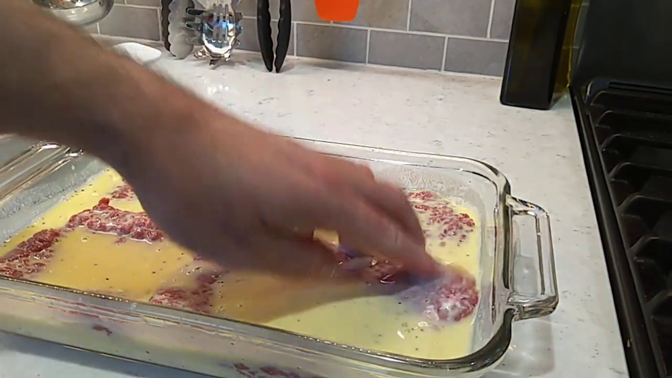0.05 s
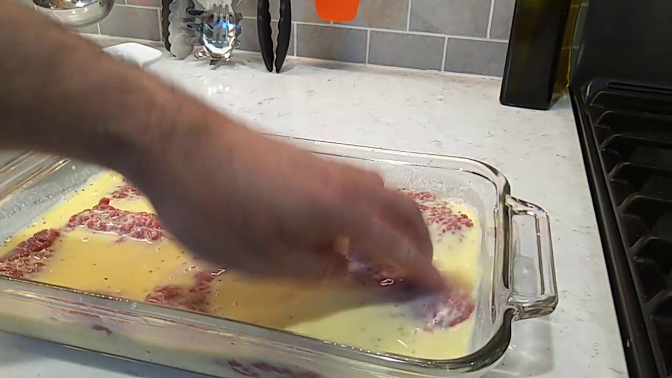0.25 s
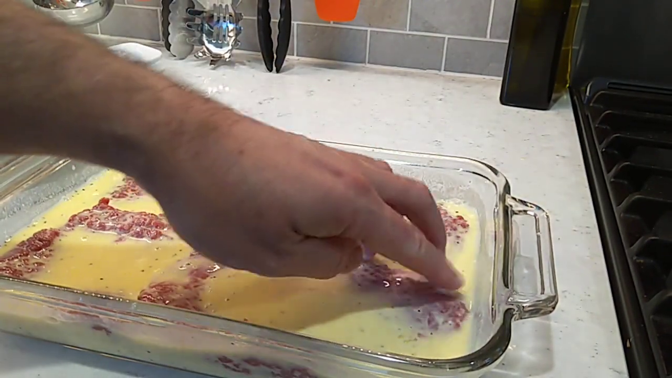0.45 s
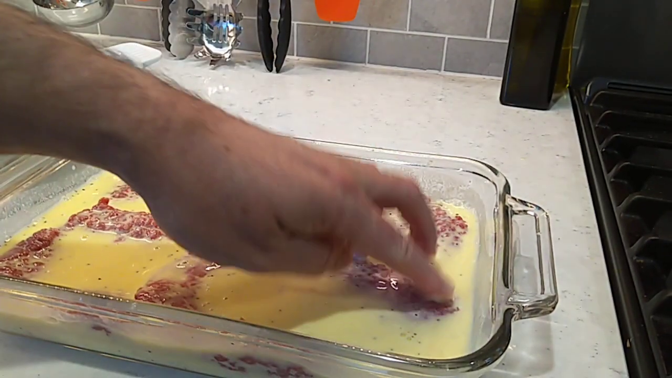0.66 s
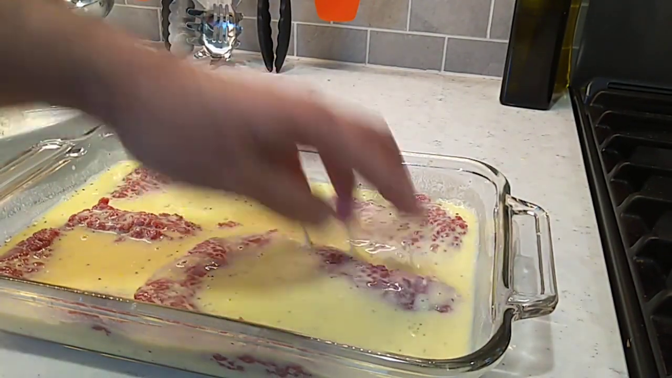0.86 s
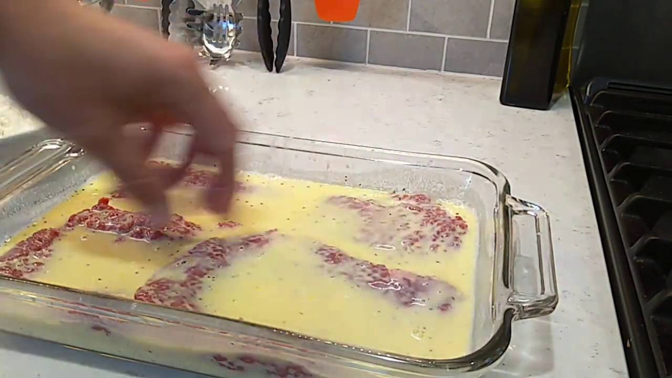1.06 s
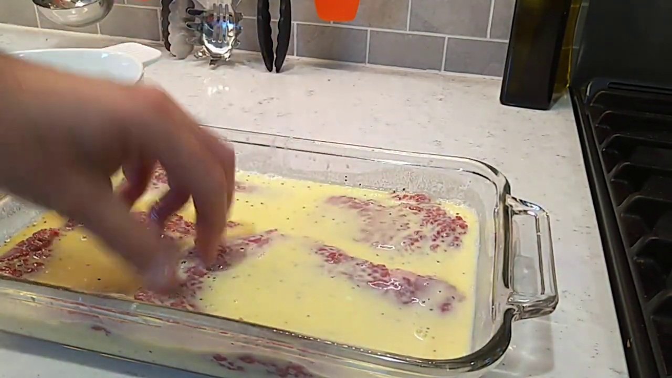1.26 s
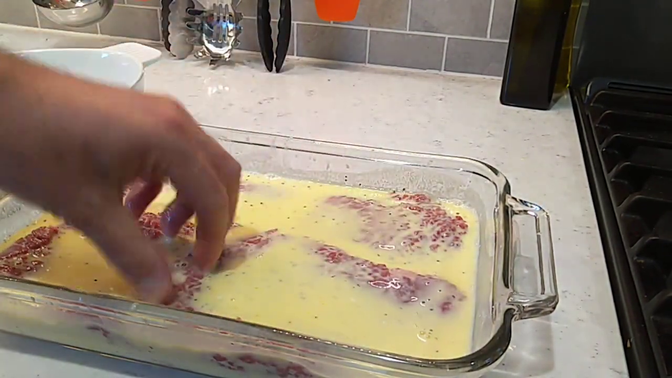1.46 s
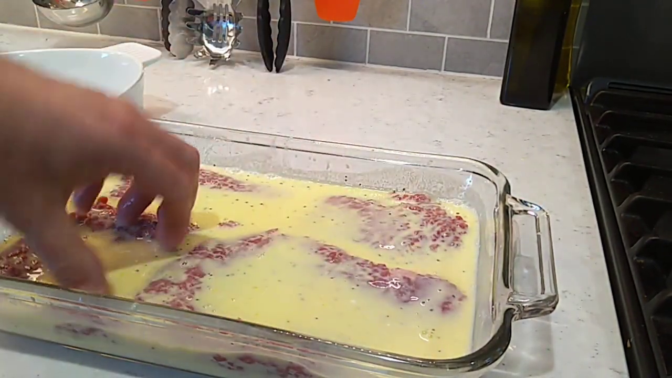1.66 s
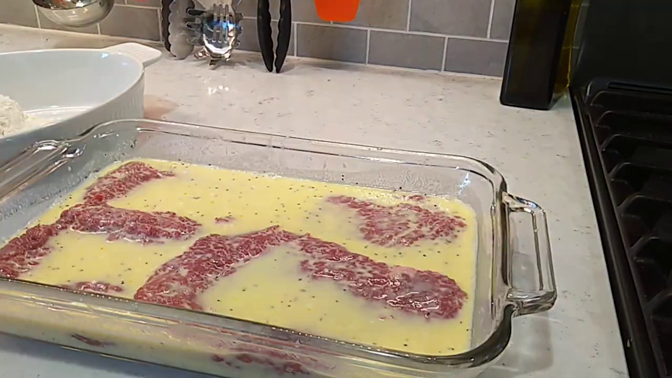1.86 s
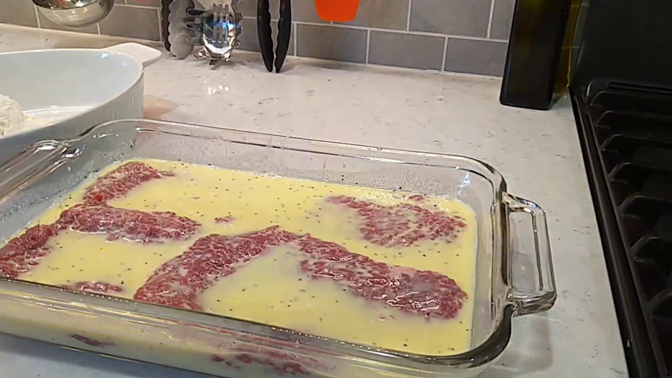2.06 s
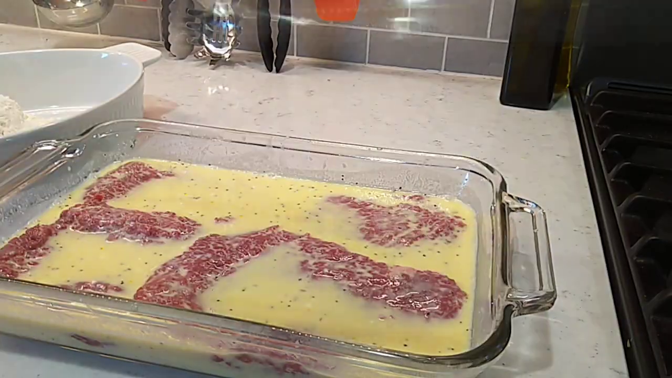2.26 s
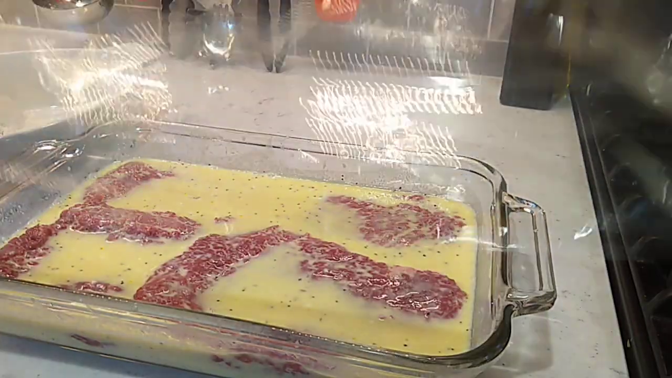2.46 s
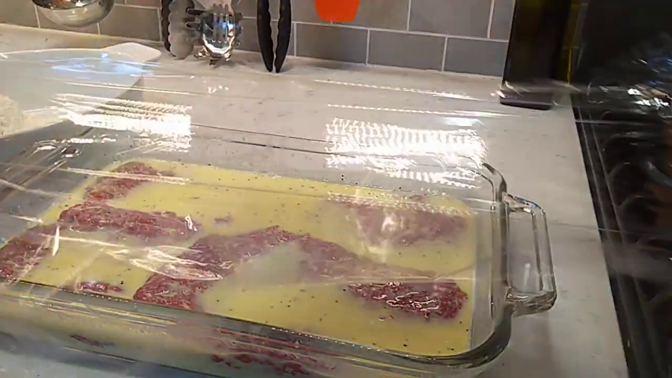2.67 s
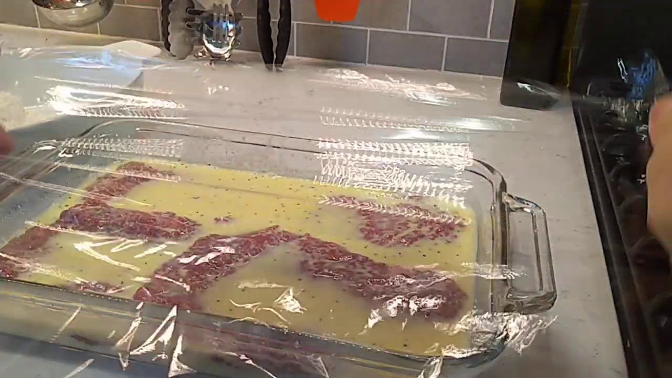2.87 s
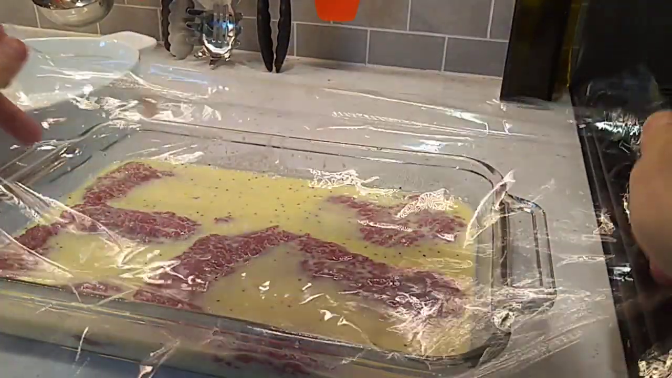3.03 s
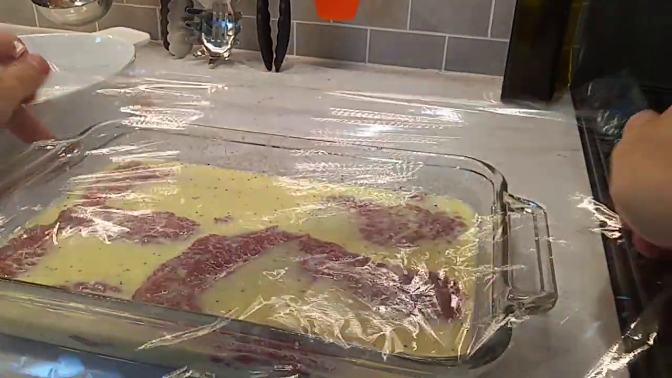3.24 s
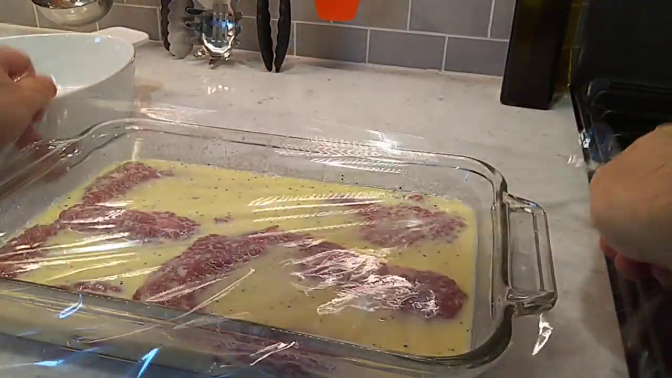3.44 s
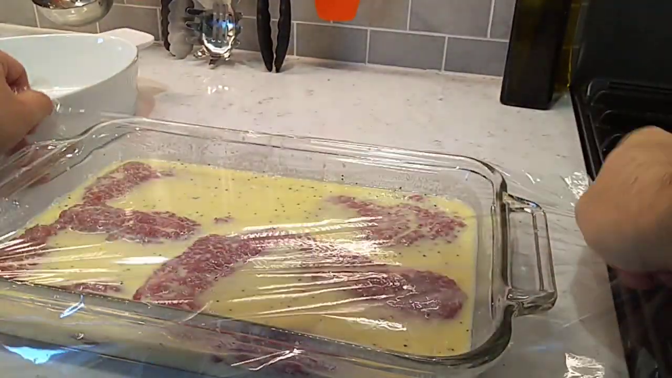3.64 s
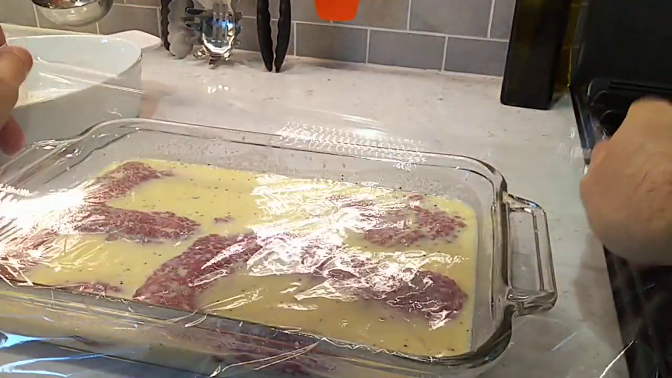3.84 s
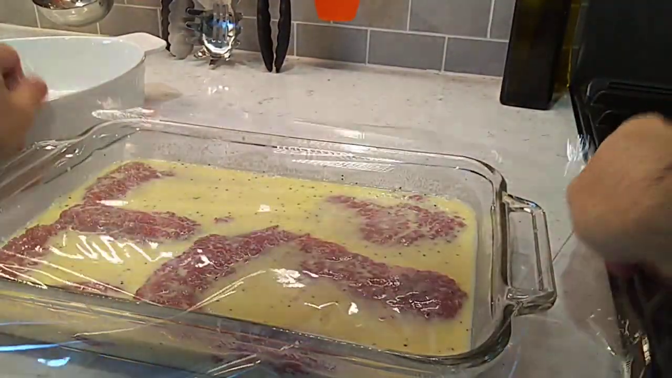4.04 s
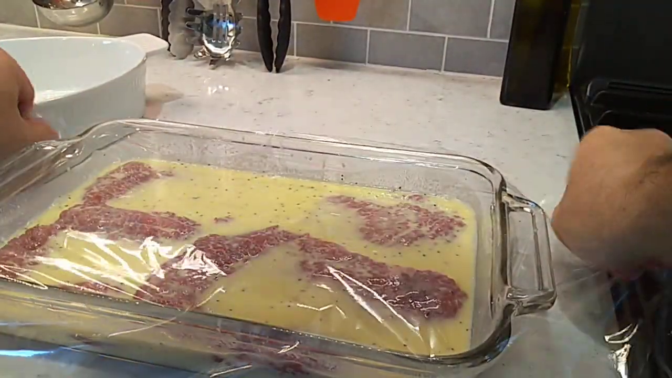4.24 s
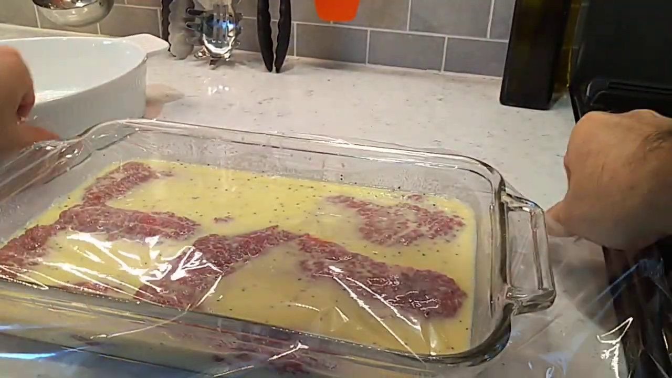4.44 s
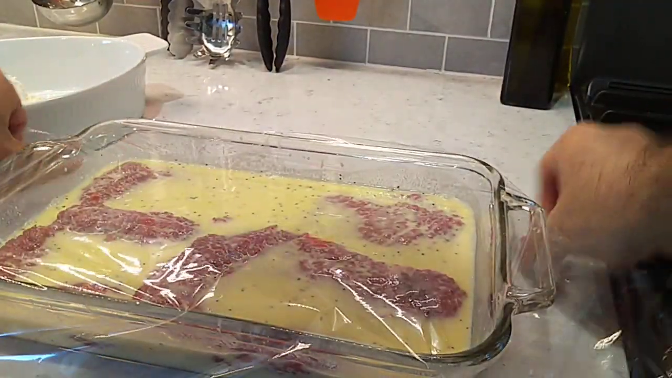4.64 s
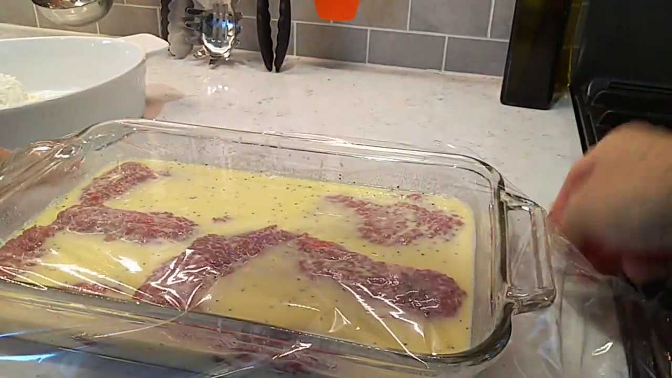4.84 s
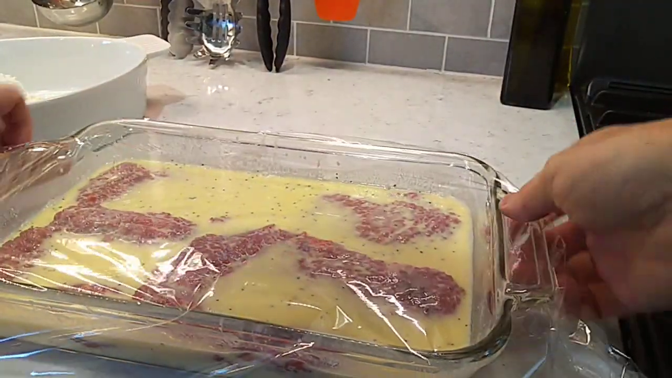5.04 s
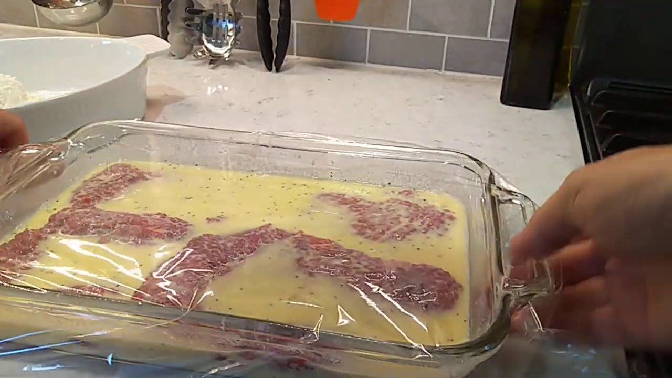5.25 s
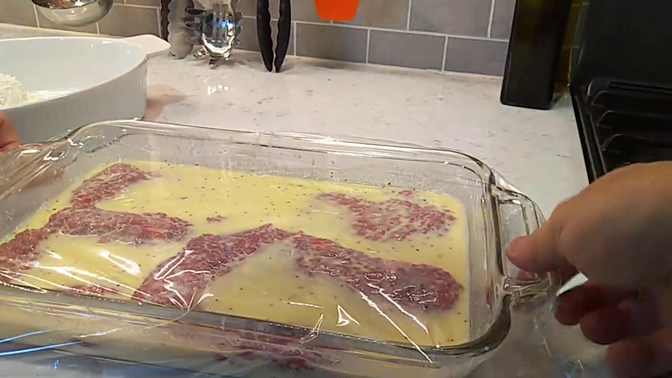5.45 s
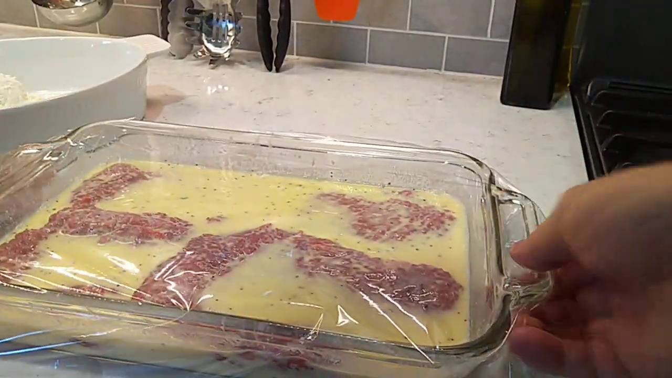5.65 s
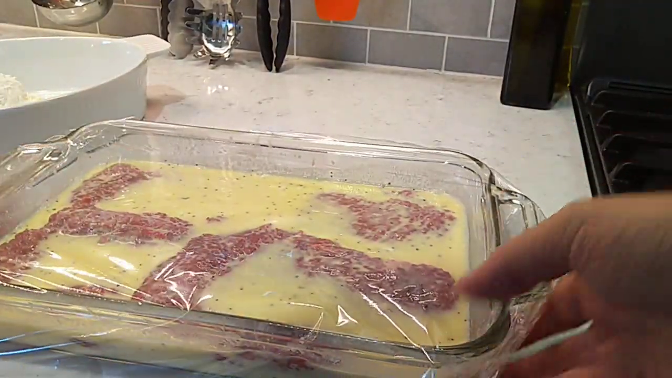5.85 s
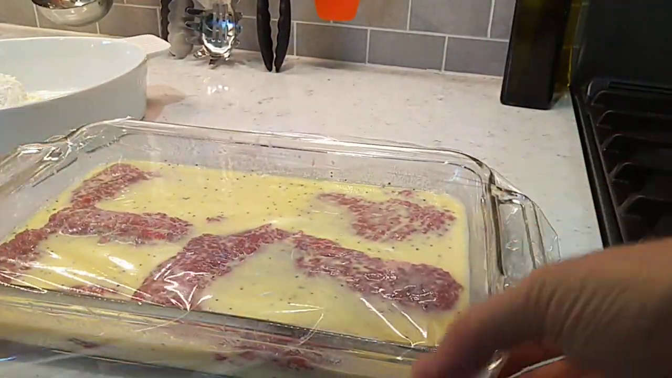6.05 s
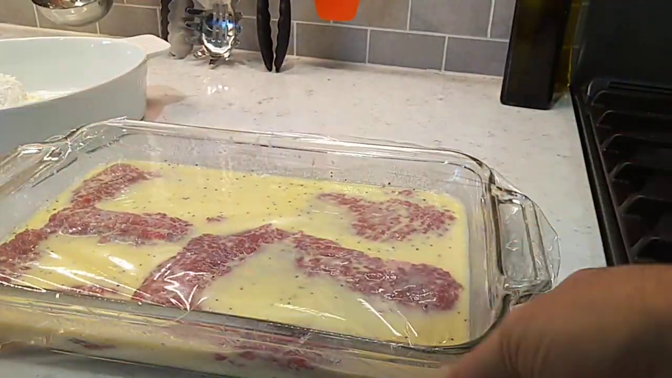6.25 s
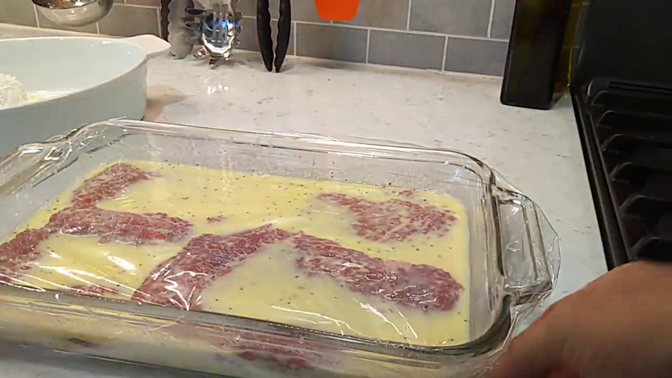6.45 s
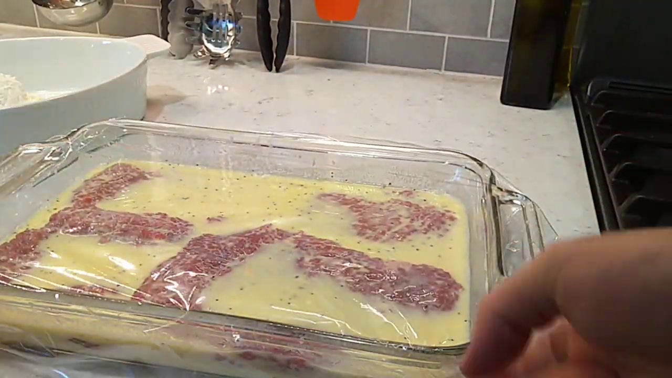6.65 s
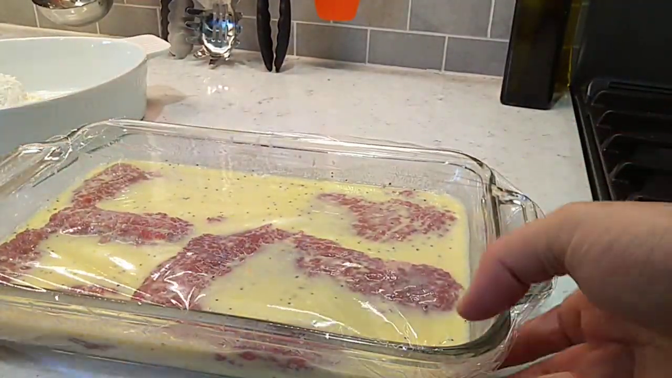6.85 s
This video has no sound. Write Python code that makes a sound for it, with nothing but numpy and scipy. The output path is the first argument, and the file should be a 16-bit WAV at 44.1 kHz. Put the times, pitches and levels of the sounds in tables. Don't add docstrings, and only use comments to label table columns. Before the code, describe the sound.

Cling film crinkles sharply with bright snaps and a thin, taut whistle, over soft glass knocks and low refrigerator hum, growing busier as it is tucked.

```python
import sys
import numpy as np
from scipy import signal
from scipy.fft import rfft, irfft
from scipy.io import wavfile
from scipy.ndimage import map_coordinates

SR = 44100
rng = np.random.default_rng(int(sys.argv[2]) if len(sys.argv) > 2 else 0)


def unload_wav(signal):
    wavfile.write(
        sys.argv[1],
        SR,
        np.round(np.clip(np.atleast_2d(signal).T, -1, 1) * 32767).astype(np.int16),
    )


def boost_factor(decibels):
    exponent = np.asarray(decibels, float) / 20
    return 10 ** exponent


N = 304334
BLOCK = 64
LIFT_S = 1.985

# pitch_hz, level_db (per Hz)
FIZZ_COLOUR = [(3500, -59), (6000, -12.5), (7000, -9.5), (9100, -7.5), (12100, 0.5), (13800, 1.5),
               (15600, -1.5), (16300, -27), (17000, -28)]
# pitch_hz, level_db (per Hz)
CREASE_COLOUR = [(1000, -23.5), (1700, -1), (2950, 0.5), (3340, 2), (5710, -1), (8000, -7.5), (10400, -37),
                 (17600, -120)]
# pitch_hz, level_db (per Hz)
FLAP_COLOUR = [(350, -8), (550, -3.5), (1100, 0.5), (1900, -4.5), (2600, -16.5)]


def unit(x):
    return x / np.sqrt(np.mean(x ** 2) + 1e-20)


def along(points, hz):
    f, v = np.transpose(points)
    return np.interp(np.log(hz + 1), np.log(f + 1), v)


def curves(rows):
    s, *cols = np.transpose(rows)
    return [np.interp(np.arange(N) / SR, s, c) for c in cols]


def wobble(rate):
    knots = rng.standard_normal(int(N * rate / SR) + 4)
    return map_coordinates(knots, [np.arange(N) * rate / SR])


def sides(pan_db):
    return boost_factor(np.array([pan_db / 2, -pan_db / 2]))


def coloured(x, spectrum, size=4096):
    gain = boost_factor(along(spectrum, np.fft.rfftfreq(size, 1 / SR)))
    cepstrum = irfft(np.log(np.maximum(gain, 1e-4)))
    cepstrum[1:size // 2] *= 2
    cepstrum[size // 2 + 1:] = 0
    pulse = irfft(np.exp(rfft(cepstrum)))
    return signal.oaconvolve(x, pulse[None] / np.linalg.norm(pulse), axes=1)[:, :N]


def scatter(s, lag_ms, shapes):
    seconds = s[:, None] + lag_ms[:, None] * [.5e-3, -.5e-3]
    start = np.round(seconds * SR).astype(int)
    at = np.clip(start[:, :, None] + np.arange(shapes.shape[2]), 0, N)
    return np.array([np.bincount(at[:, c].ravel(), shapes[:, c].ravel(), N + 1)[:N] for c in range(2)])


def bursts(draw, rise, t60, tail_db, tail_t60, shared, spike=0):
    t = np.arange(draw.shape[-1]) / SR
    fade = boost_factor(-60 * t / t60) + boost_factor(tail_db - 60 * t / tail_t60)
    shape = (1 - np.exp(-t / rise)) * fade
    share = np.clip(shared, 0, 1)
    mixed = np.sqrt(share) * draw[:, :1] + np.sqrt(1 - share) * draw[:, 1:]
    push = np.arange(len(t)) == round(2 * rise * SR)
    return shape / shape.max() * mixed + spike * push * np.sign(draw[:, :1, :1])


def swells(rows):
    fall_db, release = 13.5, .98
    s, db, length = np.transpose(rows)[:3, :, None]
    late = (np.arange(0, N + BLOCK, BLOCK) / SR - s) / length
    return boost_factor(2 * (db - fall_db * np.maximum(-late, late / release)))


def smooth(coarse):
    return np.interp(np.arange(N), np.arange(0, N + BLOCK, BLOCK), coarse)


def all_snaps():
    # start_s, treble_peak_db, middle_db (re treble), low_db (re treble), left_lag_ms
    spreading = [(2.0384, -28.5, -1.5, -5, .39), (2.1427, -36, -2.5, -16, -.34),
                 (2.3139, -12.5, -14, -32.5, .07), (2.3313, -24, -5, -15.5, -.27),
                 (2.3716, -25, -12, -31, -.12), (2.656, -27.5, -16, -41, -.27),
                 (2.792, -29.5, -10.5, -39, .23), (3.0467, -26, -15.5, -18, -.41),
                 (3.0768, -27, -19, -34, -.39), (3.1446, -27, -12, -21, -.3), (3.373, -27, -19, -22, -.29),
                 (3.57, -31, -24, -32, -.2), (3.6571, -30, -15, -25, -.14), (3.731, -17, -7, -20.5, .09),
                 (3.8147, -15.5, -6.5, -32, .06), (3.831, -13.5, -3.5, -9, .29),
                 (3.8906, -17, -7, -18, -.36), (4.0073, -27.5, -7.5, -18, -.1),
                 (4.232, -29.5, -9, -17, -.18), (4.2525, -22.5, -10.5, -32, .01),
                 (4.3143, -20.5, -6.5, -18, .01), (4.4803, -28, -22, -32, .09),
                 (4.6851, -27.5, -11.5, -6, .01), (4.828, -12, -12.5, -32.5, .01)]
    # start_s, treble_peak_db, middle_db (re treble)
    tucking = [(4.9533, -35.5, -29), (5.0015, -30.5, -11), (5.0554, -21, -20), (5.105, -28, -20),
               (5.145, -31, -23), (5.1755, -29.5, -25), (5.2782, -28, -28), (5.3601, -25, -7.5),
               (5.4, -30, -6.5), (5.6198, -28, -22), (5.7132, -30.5, -19), (5.968, -18, -11),
               (5.9809, -24, -9), (6.034, -39, -6), (6.076, -25, -8), (6.113, -22.5, -16),
               (6.314, -22.5, -16), (6.35, -26, -13), (6.388, -15, -12), (6.411, -23, -4.5),
               (6.5434, -19.5, -16.5), (6.5574, -29, -18), (6.5827, -27, -22), (6.591, -21.5, -13),
               (6.6122, -26, -31), (6.723, -31, -7), (2.229, -39.5, -13), (2.465, -34.5, -13),
               (2.6464, -34.5, -31), (4.0854, -30.5, -20)]
    taut_low_db, widest_lag_ms = -26.5, .4
    taut = [(s, db, middle_db, taut_low_db, widest_lag_ms * np.sin(2.4 * k))
            for k, (s, db, middle_db) in enumerate(tucking)]
    return np.transpose(spreading + taut)


def snaps():
    s, peak_db, middle_db, low_db, lag_ms = all_snaps()
    draw = rng.standard_normal((len(s), 3, 3, 700))
    treble = bursts(draw[:, 0], rise=.00015, t60=.0025, tail_db=-13, tail_t60=.03, shared=.3, spike=3.5)
    middle = bursts(draw[:, 1], rise=.0002, t60=.003, tail_db=-13, tail_t60=.03, shared=.4, spike=5)
    low = bursts(draw[:, 2], rise=.000431, t60=.0082, tail_db=-9.5, tail_t60=.097, shared=.78, spike=5.3)
    onset = s - .0004
    treble = boost_factor(peak_db)[:, None, None] * treble
    middle = boost_factor(peak_db + middle_db)[:, None, None] * middle
    low = boost_factor(peak_db + low_db)[:, None, None] * low
    return (boost_factor(-1.5) * coloured(scatter(onset, lag_ms, treble), FIZZ_COLOUR)
            + boost_factor(-3.5) * coloured(scatter(onset, lag_ms, middle), CREASE_COLOUR)
            + boost_factor(-1.5) * coloured(scatter(onset, lag_ms, low), FLAP_COLOUR))


def effort():
    # peak_s, fizz_db, length_s, slack_db (more slack, wider folds)
    pulls = [(2.05, -52, .05, 7), (2.15, -53, .16, 4), (2.4, -52, 0.18, -2), (2.53, -50.5, .1, -3),
             (2.68, -58, 0.073, -4), (2.79, -48, 0.14, -3), (2.99, -50, 0.092, 6), (3.15, -41, 0.19, 1),
             (3.36, -45.5, 0.19, -1.5), (3.63, -57, 0.45, -0.5), (3.75, -46.5, 0.12, -1.5),
             (3.851, -44.5, 0.075, 11.5), (4.01, -52, 0.1, 12), (4.13, -45.5, 0.16, -1),
             (4.28, -42, .08, -1), (4.45, -52.5, 0.22, 2.5), (4.58, -45.5, 0.035, 0),
             (4.731, -46.5, 0.082, 1.5), (4.9, -48, 0.16, -2.5), (5.08, -37.5, .11, -1),
             (5.31, -35.5, 0.1, 0), (5.45, -41, 0.15, 1), (5.618, -36.5, 0.06, -1), (5.881, -34, .24, -0.5),
             (6.06, -35, 0.11, -4.5), (6.22, -37, .06, -2), (6.38, -30.5, .14, -2), (6.589, -39, 0.093, 1),
             (6.79, -40, 0.065, -5), (6.91, -32, 0.15, -3.5)]
    after_db, after_t60 = -28.5, .4
    power = swells(pulls)
    slack_db = np.array(pulls)[:, 3] @ power / power.sum(0)
    s, peak_db = all_snaps()[:2, :, None]
    since = np.arange(0, N + BLOCK, BLOCK) / SR - s
    after = (since > 0) * boost_factor(2 * (peak_db + after_db - 60 * np.abs(since) / after_t60))
    return smooth(10 * np.log10(power.sum(0) + after.sum(0))), smooth(slack_db)


def folds(count):
    when, strength, place, lag = rng.random((count, 4)).T
    clump_db = 1.8 * wobble(40)[(when * N).astype(int)]
    size = boost_factor(-6 * np.log(strength + .03) + clump_db)
    size = size[:, None, None] * sides(12 * (place - .5)).T[:, :, None]
    draw = rng.standard_normal((count, 3, 90))
    shapes = bursts(draw, rise=.00015, t60=.0025, tail_db=-18, tail_t60=.01, shared=.4, spike=1.5)
    return unit(scatter(when * N / SR, .8 * (lag - .5), size * shapes))


def film_rub():
    return rng.standard_normal((2, N))


def crinkle():
    fizz_db, slack_db = effort()
    crease_db = -11.5 + .66 * slack_db
    flap_db = -13.5 + 1.47 * slack_db - .36 * (fizz_db + 45)
    pan_db = 2.5 + 1.5 * wobble(8)
    fine, wide = folds(count=8000), folds(count=4000)
    fizz = unit(coloured(fine + .54 * film_rub(), FIZZ_COLOUR))
    crease = unit(coloured(.5 * fine + .87 * wide + .97 * film_rub(), CREASE_COLOUR))
    flap = unit(coloured(.5 * fine + 1.46 * wide + 1.56 * film_rub(), FLAP_COLOUR))
    held = np.clip((np.arange(N) / SR - LIFT_S) / .02, 0, 1)
    sharp = boost_factor(fizz_db) * fizz + boost_factor(fizz_db + crease_db) * crease
    return held * (sides(pan_db) * sharp + boost_factor(fizz_db + flap_db) * flap)


def whistle(rows, jitter, flutter_db, ratio=1):
    hz, level_db = curves(rows)
    t = np.arange(N) / SR
    unsteady_hz = hz * ratio * (1 + jitter * (wobble(300) + wobble(21)))
    phase = 2 * np.pi * np.cumsum(unsteady_hz) / SR
    flutter = boost_factor(flutter_db * np.array([wobble(40), wobble(33)]))
    tone = np.sin(phase + rng.random((2, 1)) * 2 * np.pi)
    sounding = (t > rows[0][0]) * (t < rows[-1][0])
    return sounding * boost_factor(level_db) * flutter * tone


def taut_film():
    # time_s, pitch_hz, level_db
    stretch = [
        (2.5, 11000, -60),
        (2.66, 11300, -49),
        (2.75, 9900, -56),
        (2.95, 11800, -48),
        (3.04, 11100, -50),
        (3.33, 14150, -47),
        (3.46, 13900, -48),
        (3.58, 11300, -47),
        (3.69, 9300, -60),
    ]
    # pitch_ratio, level_db
    strands = [(1, -6), (1.08, -5), (.93, -10), (1.04, -10), (1.13, -11)]
    return sum(boost_factor(db) * whistle(stretch, jitter=.011, flutter_db=4, ratio=ratio) for ratio, db in strands)


def squeak(s, length, from_hz, to_hz, db):
    edge, edge_db = .25 * length, db - 12
    path = [(s, from_hz, edge_db),
            (s + edge, (from_hz + to_hz) / 2, db),
            (s + length / 2, to_hz, db),
            (s + length - edge, to_hz, db),
            (s + length, to_hz, edge_db)]
    return whistle(path, jitter=.006, flutter_db=4)


def wet_meat():
    # start_s, length_s, start_pitch_hz, end_pitch_hz, level_db
    squeaks = [
        (.1, .11, 7650, 8000, -76),
        (.24, .1, 8500, 9100, -71),
        (.33, .1, 10250, 10500, -75),
        (.41, .05, 9900, 9750, -69),
        (.46, .09, 10000, 10200, -74),
        (.55, .045, 10050, 9750, -66),
        (.54, .04, 8600, 8850, -71),
        (.65, .1, 10450, 10350, -71),
    ]
    return sum(squeak(*row) for row in squeaks)


def dish():
    # start_s, peak_db, pitch_hz, t60_s, left_right_db
    knocks = [(.86, -44, 955, 0.026, 5), (.9, -60, 645, 0.12, 7), (2.478, -57.5, 875, 0.027, 49),
              (2.79, -37, 960, 0.022, -5), (2.937, -39, 1060, 0.036, 13), (2.945, -48, 792, 0.14, 14),
              (2.98, -48, 245, 0.096, 3), (3.044, -44, 425, 0.11, 8), (3.82, -37.5, 240, 0.16, 7),
              (3.829, -46, 1008, 0.3, 2), (4.68, -66, 720, .08, 5), (4.85, -43.5, 88, 0.2, -1),
              (4.855, -40, 237, 0.16, 1), (5.5, -46, 790, 0.17, 12), (5.52, -46, 250, 0.26, 4),
              (5.552, -49, 64.7, 0.23, 9), (6.015, -49, 91.5, 0.17, 3)]
    # peak_s, level_db, length_s
    stirs = [
        (3.02, -47, 0.21),
        (3.83, -42, 0.03),
        (4.87, -50, 0.059),
        (5.55, -42.5, .05),
        (5.78, -52.5, .06),
    ]
    # pitch_hz, level_db (per Hz)
    dish_colour = [(90, -3), (170, -3.5), (240, 1.5), (320, 3.5), (420, -1), (600, -7.5), (900, -25.5)]
    modes = [(1, 1), (.79, .4), (1.17, .28), (1.4, .2)]
    out, t = np.zeros((2, N + SR)), np.arange(SR // 2) / SR
    for s, db, hz, t60, pan_db in knocks:
        ring = sum(np.sin(2 * np.pi * hz * near * t) * share for near, share in modes)
        soft_start = 1 - np.exp(-t / .0067)
        knock = boost_factor(db - 60 * t / t60) * soft_start * ring
        out[:, round(s * SR):][:, :len(t)] += sides(pan_db)[:, None] * knock
    calm_db = np.where(np.arange(N) / SR > LIFT_S, -55, -66)
    stir_db = 10 * np.log10(smooth(swells(stirs).sum(0)) + boost_factor(2 * calm_db))
    noise = rng.standard_normal((3, N))
    mostly_shared = noise[:1] + .25 * noise[1:]
    stir = unit(coloured(mostly_shared, dish_colour) * boost_factor(1.28 * wobble(25)))
    return out[:, :N] + boost_factor(stir_db - 5) * sides(np.array([3.])) * stir


def tiles(x, count=24):
    # pitch_hz, t60_s
    echo_times = [(300, 0.39), (2000, 0.078), (8000, 0.16), (16000, 0.04)]
    out, step = np.zeros((2, N + SR)), N // count + 1
    for start in range(0, N, step):
        hz, t, z = signal.stft(rng.standard_normal((2, SR // 4)), SR, nperseg=256)
        decay = boost_factor(-60 * t / along(echo_times, hz)[:, None])
        tail = signal.istft(z * decay, SR, nperseg=256)[1]
        answer = signal.fftconvolve(x[:, start:start + step], tail / np.linalg.norm(tail[0]), axes=1)
        out[:, start + 60:][:, :answer.shape[1]] += answer
    return out[:, :N]


def kitchen():
    # pitch_hz, level_db (per Hz)
    air_colour = [(15, -58), (25, -52), (41, -17), (64, 5), (161, -11), (206, 3), (308, -20.5), (353, -3),
                  (383, -50), (693, -16.5), (1160, -21.5), (1400, -23.5), (6700, -26.5), (10000, -23.5),
                  (15900, -20.5)]
    # pitch_hz, likeness (1 is the same, 0 unrelated)
    likeness = [(60, 0.79), (130, 0.79), (290, 0.73), (640, 0.32), (1410, -0.04), (3100, 0.05),
                (6820, -0.05), (15000, -0.04)]
    # pitch_hz, level_db (rms)
    hum_lines = [(59.2, -68.5), (204.6, -71), (355.3, -116), (710.6, -88), (1130, -89.5), (1190, -91.5)]
    hz = np.fft.rfftfreq(N, 1 / SR)
    turn = np.arccos(np.clip(along(likeness, hz), -1, 1)) / 2
    noise = rfft(rng.standard_normal((2, N))) * boost_factor(along(air_colour, hz))
    mid, side = irfft(noise * [np.cos(turn), np.sin(turn)], N)
    air = boost_factor(-61.5) * unit(np.array([mid + side, mid - side]))
    t = np.arange(N) / SR
    hum = sum(np.sqrt(2) * boost_factor(db + 1.5 * wobble(5)) * np.sin(2 * np.pi * f * t + .6 * wobble(4))
              for f, db in hum_lines)
    return air + hum * sides(np.array([1.5]))


def scene():
    close = snaps() + dish()
    return close + crinkle() + taut_film() + wet_meat() + boost_factor(-13.5) * tiles(close) + kitchen()


def band_limit(x):
    return signal.sosfilt(signal.butter(12, 15950, fs=SR, output="sos"), x)


def record(dry):
    bass_cut = signal.butter(2, 42, "highpass", fs=SR, output="sos")
    mix = signal.sosfilt(bass_cut, dry)
    return band_limit(mix)


dry = scene()
out = record(dry)
unload_wav(out)
```